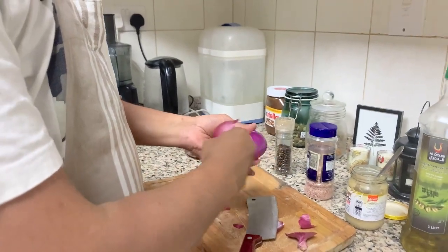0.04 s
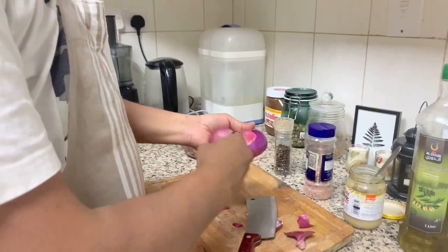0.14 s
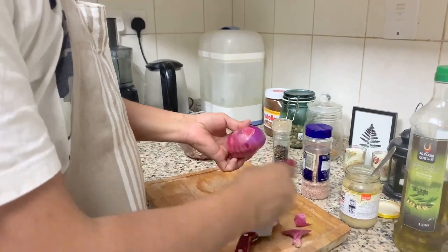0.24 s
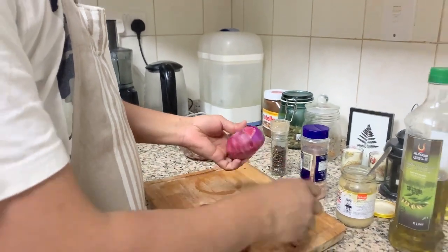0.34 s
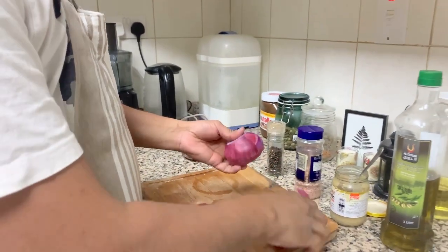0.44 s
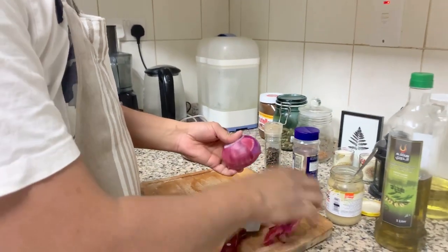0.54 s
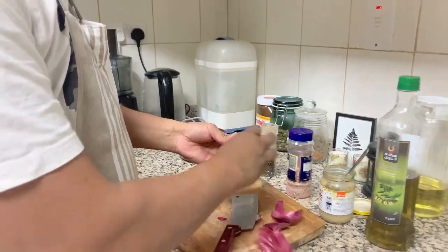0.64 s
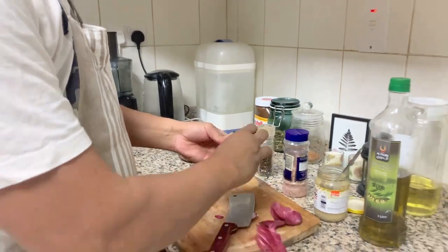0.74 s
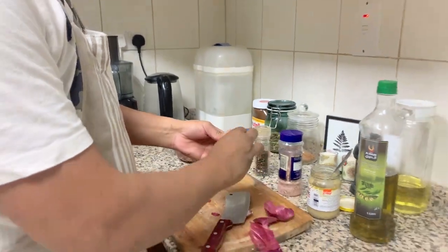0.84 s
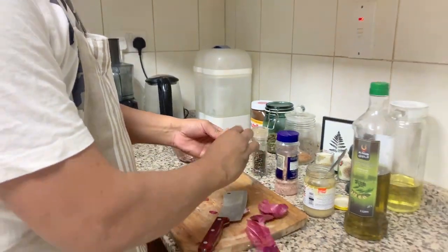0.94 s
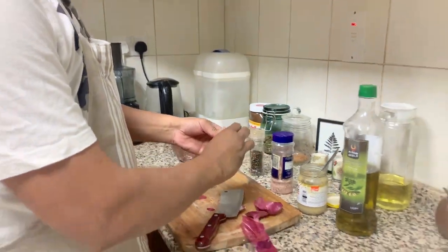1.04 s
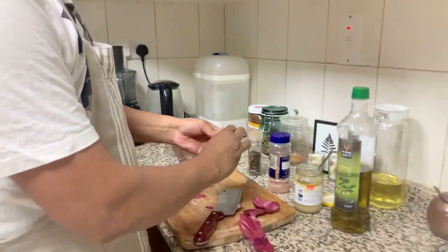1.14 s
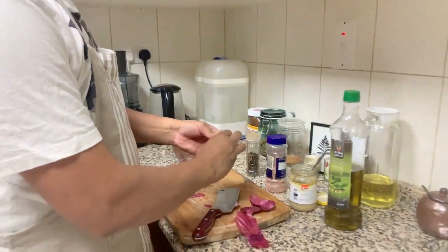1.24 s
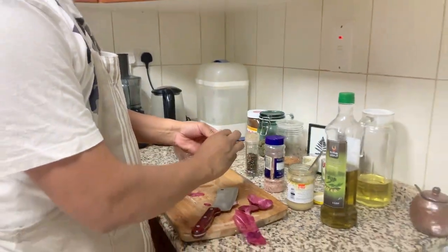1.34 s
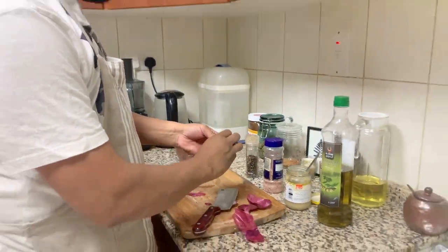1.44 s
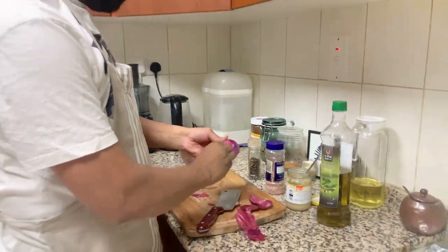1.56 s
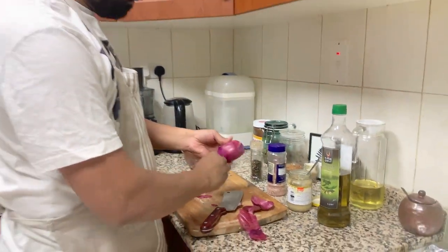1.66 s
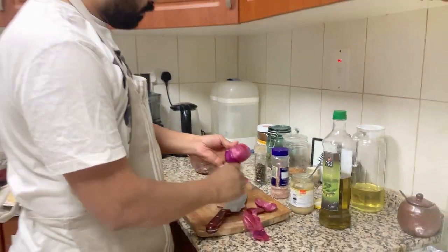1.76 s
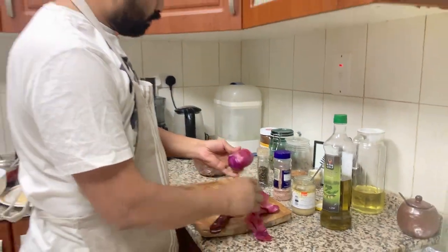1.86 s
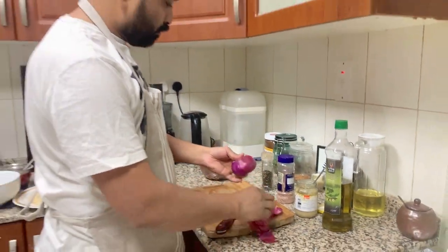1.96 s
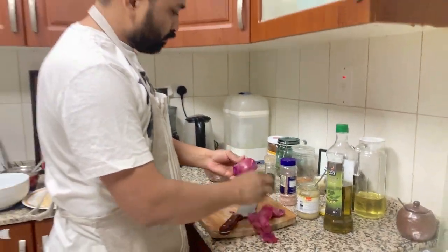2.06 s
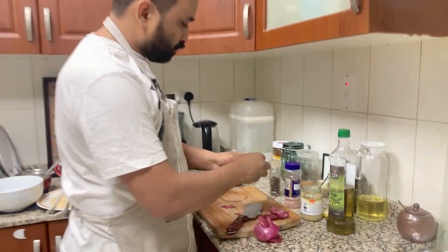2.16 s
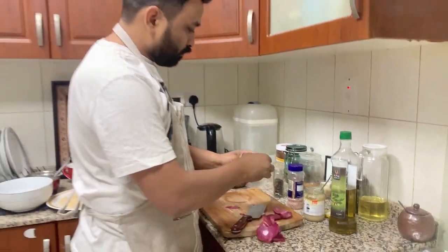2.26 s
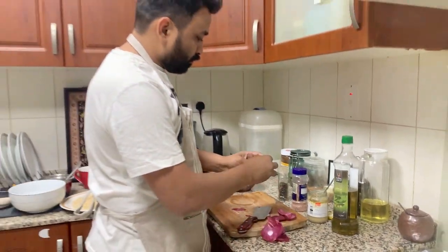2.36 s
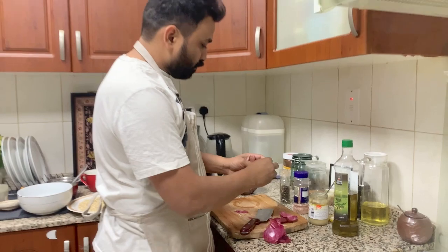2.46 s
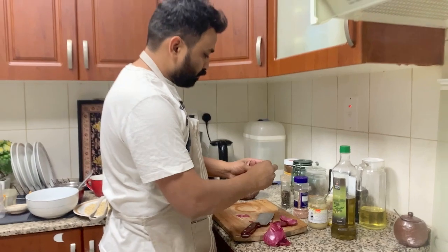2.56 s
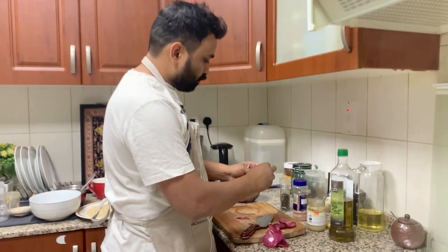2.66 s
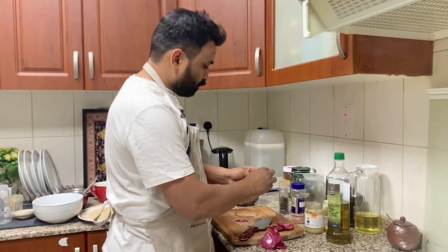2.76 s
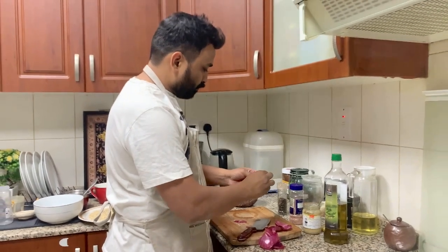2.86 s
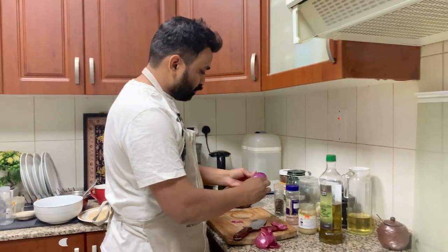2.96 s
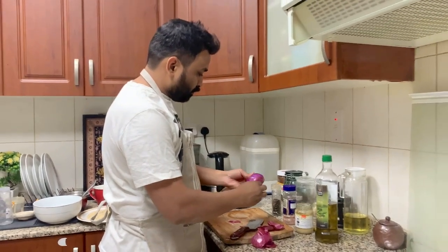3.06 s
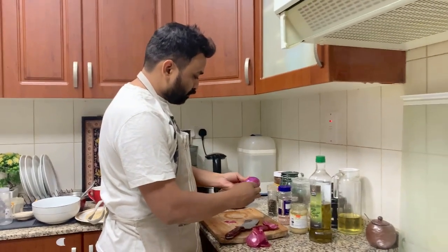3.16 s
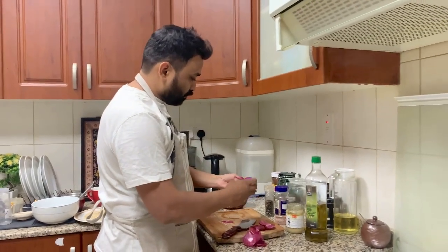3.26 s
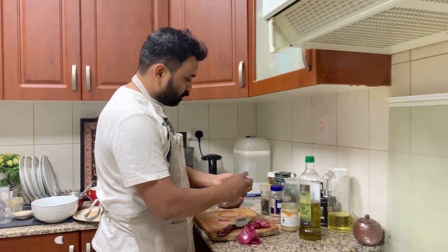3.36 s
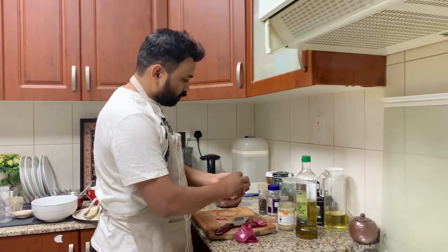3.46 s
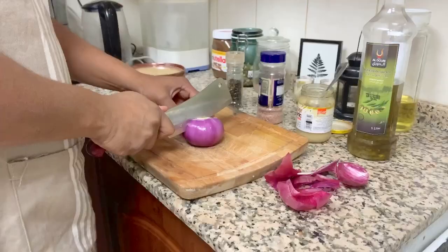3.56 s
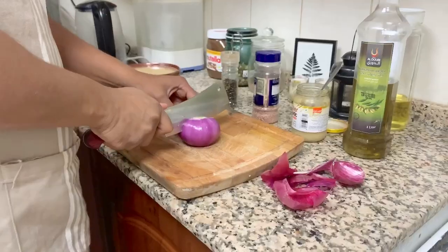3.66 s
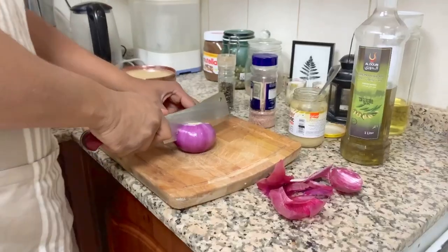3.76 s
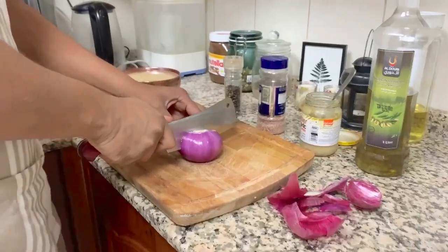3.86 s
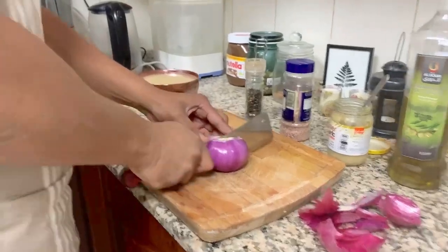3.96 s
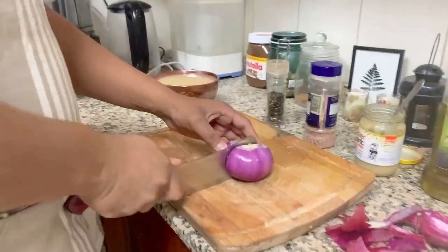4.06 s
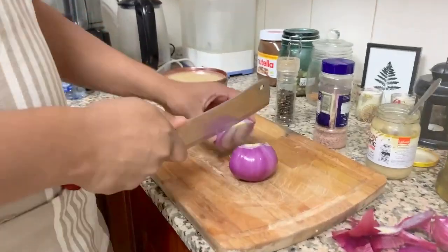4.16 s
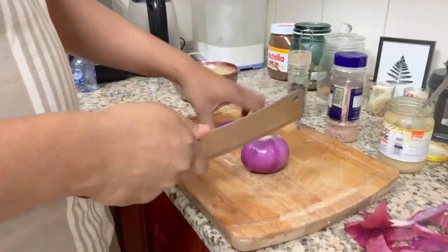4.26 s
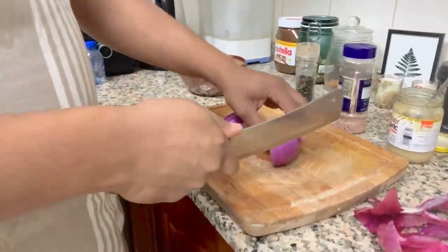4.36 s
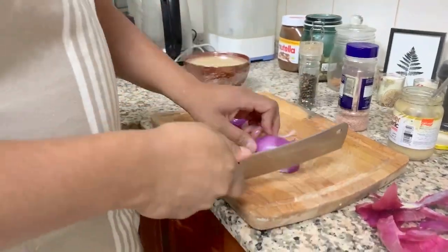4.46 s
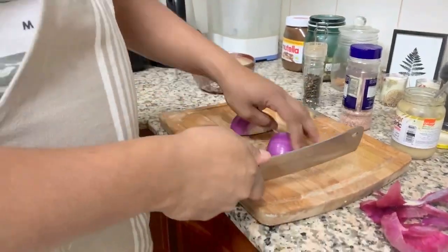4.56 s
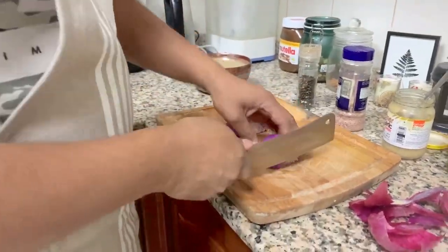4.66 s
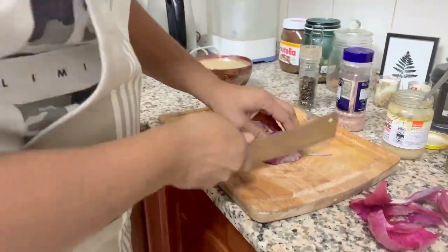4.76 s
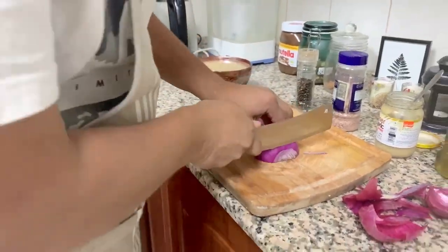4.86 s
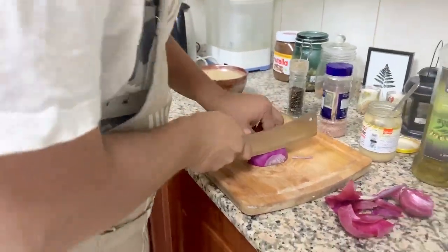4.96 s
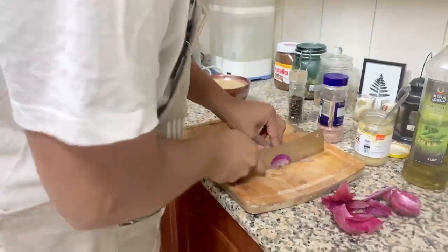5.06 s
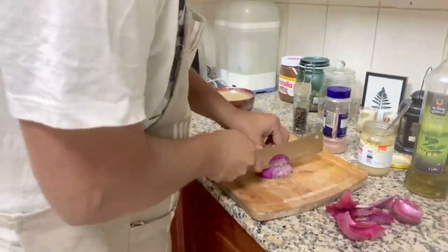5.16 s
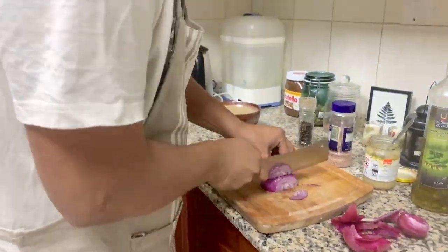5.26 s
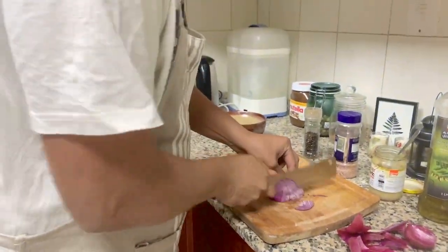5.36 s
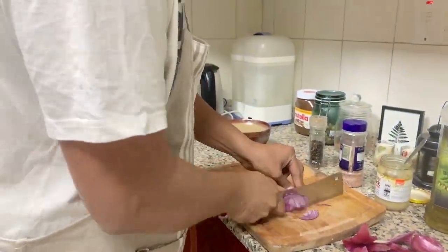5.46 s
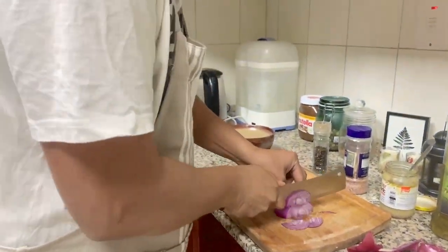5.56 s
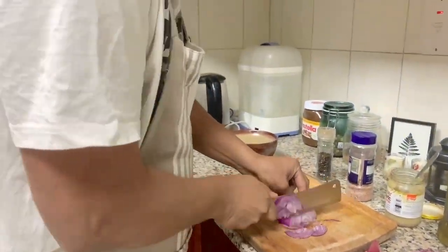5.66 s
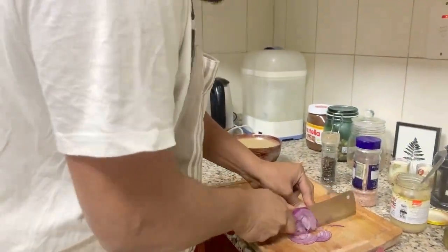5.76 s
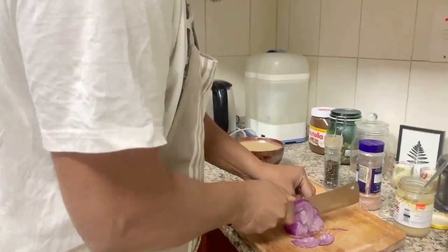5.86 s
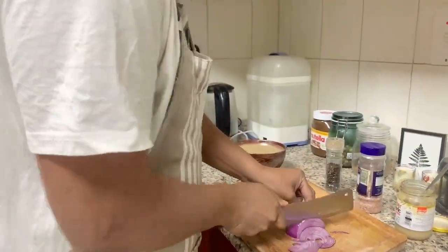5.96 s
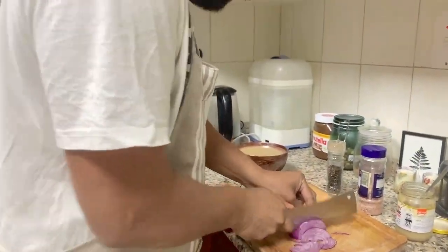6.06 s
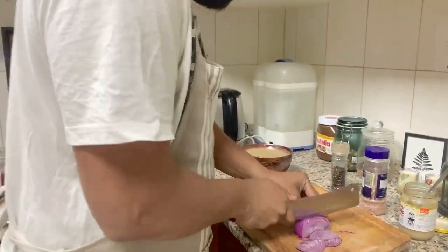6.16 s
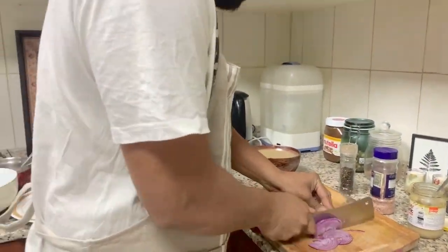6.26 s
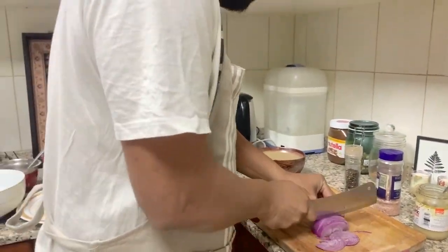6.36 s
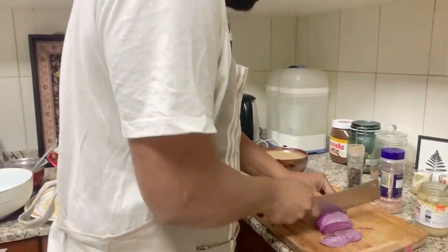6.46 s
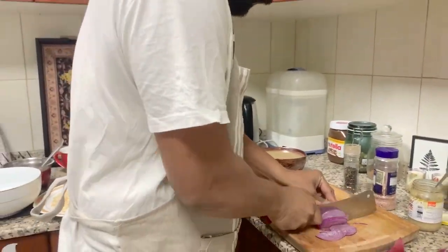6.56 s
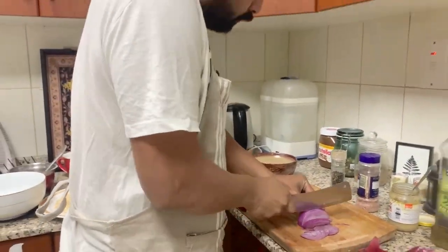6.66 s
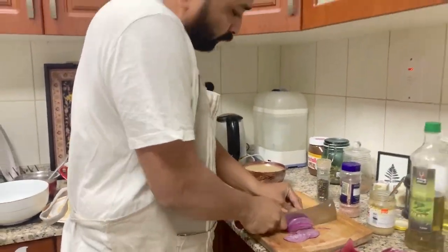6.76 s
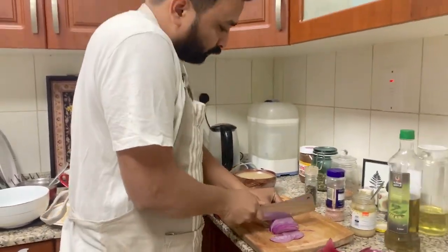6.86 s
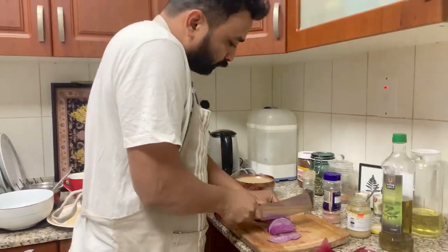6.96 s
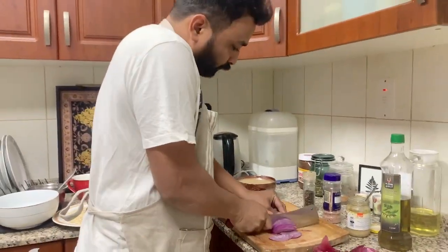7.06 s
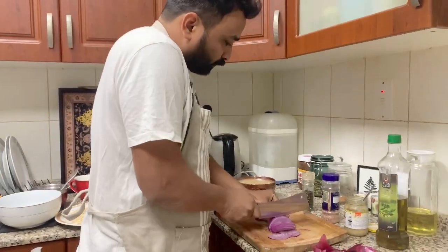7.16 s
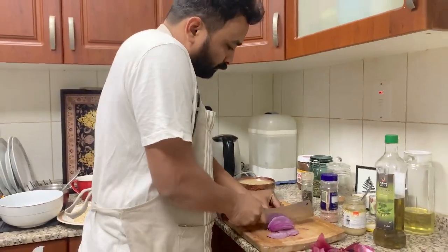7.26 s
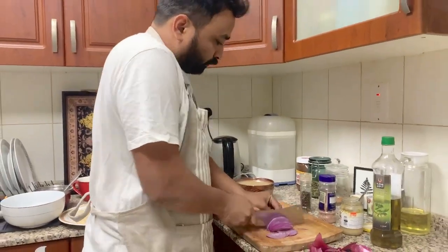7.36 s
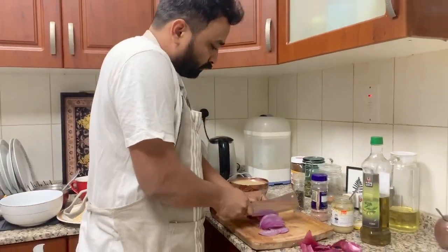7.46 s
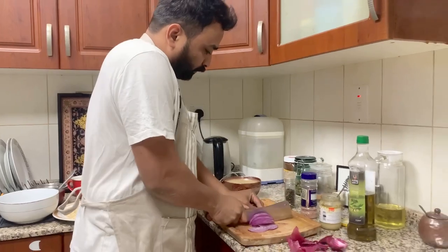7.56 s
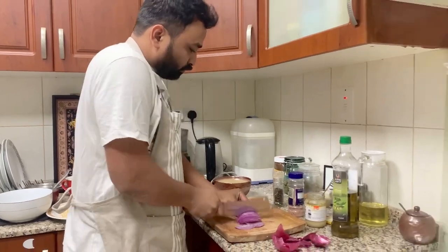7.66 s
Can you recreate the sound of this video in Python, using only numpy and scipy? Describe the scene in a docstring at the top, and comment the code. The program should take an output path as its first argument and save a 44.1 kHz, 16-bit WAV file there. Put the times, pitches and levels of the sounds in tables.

```python
"""Peeling and slicing an onion

In a tiled kitchen, hands peel an onion; after a brief gap of silence the scene changes, and it is sliced on a
wooden board. Dry skin is made of tiny random cracks and short noise bursts, with echoes from the kitchen. Each
cut crunches as grains of noise, then the cleaver knocks: noise and sine waves ring as board and blade. Soft
rubs, dull thuds, rumble and room noise fill in; a limiter holds down the highest peaks."""
import sys
import numpy as np
from scipy import signal
from scipy.fft import rfft, irfft
from scipy.io import wavfile
from scipy.ndimage import uniform_filter1d, minimum_filter1d, map_coordinates

SR = 44100
rng = np.random.default_rng(int(sys.argv[2]) if len(sys.argv) > 2 else 0)


def log_audio(samples):
    """Write samples as a 16-bit WAV file to the path given in sys.argv[1]."""
    # one column per channel
    frames = np.atleast_2d(samples).T
    # limit to full scale, then quantise
    limited = np.clip(frames, -1, 1)
    pcm = np.round(limited * 32767).astype(np.int16)
    wavfile.write(sys.argv[1], SR, pcm)


N = 339992
TIME = np.arange(N) / SR
RING = TIME[:SR // 2]  # the clock of one short sound, half a second

# Levels are settings before echoes, final filters and the limiter. A t60 is the time to fade by 60 dB.
# Spectra give level per Hz; only their shape counts, because the noise is then scaled to rms 1.

# cleaver meets board: t/s, wood level/dB, highest f excited by the contact/Hz, blade level/dB, crunch level/dB
CUTS = [(3.8329, -19.5, 10800, -13, -31.5), (4.962, -12, 8300, -7.5, -23.5),
        (5.1035, -12.5, 5950, -13, -26.5), (5.2376, -12, 4500, 4.5, -20),
        (5.378, -15.5, 6200, -21.5, -31.5), (5.4983, -14, 6450, -6, -25.5), (5.6671, -14, 1760, -1, -32),
        (5.813, -17, 6100, -29, -32), (5.9898, -10, 8100, -11.5, -28), (6.1538, -15.5, 6200, -29, -30),
        (6.3101, -11, 4500, 3, -25.5), (6.4736, -20, 4630, -30, -35), (6.646, -12.5, 10000, -24.5, -31.5),
        (6.9757, -14, 10000, -40, -31), (7.2109, -13, 11500, -22.5, -31), (7.459, -11.5, 11200, -18, -33)]
# dry skin snaps: t/s, level/dB, flake f/Hz, flake level/dB, after-ring level/dB (last two relative to the snap)
SNAPS = [(0.0946, -30, 2330, 2.5, -13.5), (0.4677, -19.5, 2370, -12, -16), (.915, -54.5, 1940, 6, -5),
         (0.992, -36.5, 2180, -11, -13.5), (1.346, -46, 2500, -10, 1), (1.375, -42, 2600, -6, -3),
         (1.3875, -17, 2880, -3.5, -6), (1.4686, -25, 2650, 3.5, -1.5), (2.4067, -26, 6120, -3.5, -15),
         (3.117, -49.5, 7400, -12, -4), (3.2478, -27.5, 2360, -4, -22), (3.36, -34.5, 4200, -4, -8)]
# dry skin tears: loudest t/s, length of the swell/s, level/dB, tilt/dB per octave
TEARS = [(.001, 0.057, -36.5, 1), (.275, 0.051, -48.5, -0.5), (.455, 0.036, -48, 1.5),
         (1.03, 0.045, -48, 6), (1.245, .048, -51.5, 5), (1.43, 0.094, -29, 2.5), (1.505, .1, -24.5, 2.5),
         (1.82, 0.032, -44, 0.5), (1.95, 0.14, -54.5, 1), (2.145, 0.025, -50.5, -3),
         (2.76, 0.069, -33, 5.5), (2.82, 0.1, -38.5, 2), (3.356, .028, -44, 4), (3.41, 0.076, -50.5, 11)]
# fingers and blade shift on the wet onion: loudest t/s, level/dB
RUBS = [(3.554, -45), (3.625, -40.5), (3.695, -43), (3.948, -33.5), (4.384, -48), (4.447, -52),
        (4.875, -48.5), (6.578, -63)]
# the onion's body thuds on the board as it splits, tips over or is pressed down: t/s, f/Hz, level/dB
THUDS = [(3.8346, 855, -27), (3.949, 670, -34), (4.378, 535, -27), (4.394, 626, -38), (5.22, 380, -33.5),
         (6.124, 380, -32), (6.288, 380, -33.5), (6.616, 380, -34)]
# ringing modes of the board on the counter: f/Hz, level/dB
BOARD_MODES = [(172, -6), (264, -1), (312, -7), (366, -6), (479, -7), (533, -6), (1017, -7), (1265, -7),
               (1330, -5), (1384, -5), (1518, -6), (2089, 0), (2546, -2), (2616, -1), (2762, -3),
               (2859, -2), (2929, -2), (3149, -1), (3203, -1), (3456, 0), (4247, -2), (4544, -1),
               (4619, -1), (5814, -2), (5927, -4)]
# ringing modes of the steel blade: f/Hz, level/dB, t60/s
BLADE_MODES = [(3063, -6, 0.11), (3122, -3, 0.15), (3241, 0, 0.11), (3316, -4, 0.11), (3871, -5, 0.12),
               (3957, -2, 0.13), (4102, -6, 0.12), (4285, -1, 0.11), (4506, -2, 0.11), (4592, -6, 0.16),
               (4646, -6, 0.11), (6277, -4, 0.15), (6352, -1, 0.14), (6406, -1, 0.15), (6492, -2, 0.16),
               (6562, 0, 0.16), (6611, -4, 0.12), (6675, -3, 0.11), (6821, -4, 0.15), (8312, -11, 0.13),
               (8629, -10, 0.12)]
# spectrum of the wooden board's dense ring: f/Hz, level/dB
WOOD_SPECTRUM = [(40, -33), (120, -72), (250, -7), (450, -9), (850, -2.5), (1800, -0.5), (2700, 7.5),
                 (4500, 3), (5400, -1.5), (6100, 1), (7600, -4.5), (10000, -3.5), (12000, -8), (16000, -22)]
# spectrum of the steel blade's countless weaker modes: f/Hz, level/dB
STEEL_SPECTRUM = [(300, -36), (2000, -27), (2800, -10.5), (3200, 3.5), (3550, -2), (4500, 4.5),
                  (5450, -5.5), (6500, 3.5), (7500, -8), (8600, -4), (9600, -11), (12000, -14),
                  (16000, -25)]
# spectrum of wet cells bursting: f/Hz, level/dB
CRUNCH_SPECTRUM = [(100, -11), (500, 11), (900, 5.5), (1800, 4), (2600, 5.5), (5300, 6.5), (6300, 10),
                   (7500, 7), (11000, 8.5), (16000, 5)]
# spectrum of dry skin tearing: f/Hz, level/dB
SKIN_SPECTRUM = [(150, -39), (250, -8.5), (566, -8.5), (640, -3.5), (890, -2.5), (1120, -4.5), (1220, -3),
                 (2710, -5), (3120, -7), (6700, -9), (10400, -27), (14700, -27), (16000, -23)]
# spectrum of a snap of dry skin: f/Hz, level/dB
SNAP_SPECTRUM = [(200, -22.5), (900, -8), (2200, 1.5), (4000, 0.5), (6300, -1.5), (8500, -13.5),
                 (11000, -23), (16000, -22)]
# how fast knocks and echoes fade while slicing: f/Hz, t60/s
SLICE_DECAY = [(150, 0.1), (400, 0.2), (1000, .15), (3000, 0.14), (7000, 0.15), (15000, 0.14)]
# how fast the echoes fade while peeling, longer than while slicing: f/Hz, t60/s
PEEL_DECAY = [(300, 0.38), (2000, 0.5), (5500, 0.44), (15000, 0.36)]
# spectrum of the room noise while peeling: f/Hz, level/dB
PEEL_AIR = [(12, -50), (20, -26), (44, -7.5), (107, -13.5), (187, -18), (301, -19.5), (337, -25.5),
            (367, -26), (399, -26), (718, -29), (849, -30), (1290, -25), (1660, -36), (5530, -44),
            (16000, -63)]
# spectrum of the room noise while slicing: f/Hz, level/dB
SLICE_AIR = [(15, -95), (25, -67), (76, -14), (130, -10.5), (190, 1.5), (285, -12.5), (344, -6.5),
             (624, -15.5), (796, -13), (1440, -22), (1610, -23.5), (3250, -23.5), (4740, -22),
             (5570, -28.5), (16000, -40)]
# narrow drones while peeling, two low hums and a thin whine: f/Hz, width/Hz, level/dB
PEEL_DRONES = [(52, 11, -53), (110.2, 14, -57), (1290, 92, -66)]
# narrow drones and a band of hiss while slicing: f/Hz, width/Hz, level/dB before the slicing air's trim
SLICE_DRONES = [(188.5, 8.5, -52), (349.3, 6.3, -57), (4790, 550, -62.5)]

PEEL_AIR_DB, SLICE_AIR_DB = -51, -48  # wash of the room noise, before the trim
SLICE_AIR_TRIM_DB = -0.5  # turns the whole slicing air down, drones included
BREAK_START_S, BREAK_END_S = 3.446, 3.502
TOP_HZ = 15850  # the finished sound has little above this

# a tear or rub swells for this share of its length and fades for the rest
RISE_SHARE = 0.39
RUB_S, RUB_TILT_DB = 0.025, 0.5  # tilt in dB per octave
# a smaller, higher flake also breaks more brightly (dB/octave of tilt for each octave of pitch)
FLAKE_WIDTH_HZ, USUAL_FLAKE_HZ, BRIGHTEN_DB = 960, 2520, 7.5

# an ordinary cut, which the rules for stroke and push start from
USUAL_BLOW_DB, USUAL_CRUNCH_DB = -12, -30
# strokes start quick; towards the thick middle of the onion the edge needs ever longer to get through
RUN_START_S, QUICK_STROKE_S, SLOWING_S_PER_S = 4.96, 0.026, 0.021
HURRY = 0.43  # power by which a hard blow shortens its stroke
# the edge scores the skin (share of the stroke), then bites in; the sound stops soon after it lands
SCORE_SHARE, SCORE_DB, BITE_S, STOP_S = 0.33, -19, 0.023, 0.0054
# the push on the board follows the crunch: dB in an ordinary cut, dB per dB of crunch
PUSH_DB, PUSH_PER_CRUNCH = -38, 1.02
HEAVE_DB = -12  # the landing heaves the whole board, relative to the blow
# a soft contact gives a broad, short thud and only the dull part of the board's ring
THUD_WIDTH_HZ, THUD_T60_S, THUD_CONTACT_HZ = 480, 0.14, 2420
THUD_WOOD_DB, THUD_BASS_DB = -4, -4  # relative to the thud


def amp(db):
    """Turns decibels into gain."""
    return 10 ** (np.asarray(db) / 20)


def unit(x):
    """Scales x to rms 1."""
    return x / np.sqrt(np.mean(x ** 2) + 1e-20)


def noise(length=len(RING)):
    """Plain random noise, half a second unless told otherwise."""
    return rng.standard_normal(length)


def read(points, hz):
    """Reads a table between its points, on a log-frequency axis."""
    f, value = np.transpose(points)
    return np.interp(np.log(hz + 1), np.log(f + 1), value)


def add(mix, s, sound):
    """Mixes a sound in at time s."""
    part = mix[max(round(s * SR), 0):][:len(sound)]
    part += sound[:len(part)]


def wander(length, step):
    """A smooth random curve of rms 1 that turns about every `step` points."""
    knots = noise(length)
    return unit(map_coordinates(knots, [np.arange(length) / max(step, 1)], order=3, mode="nearest"))


def colour(x, spectrum, tilt_db=0, ripple_db=0):
    """Gives x a spectrum at rms 1, tilted by dB per octave, with chance peaks from the spot that is touched."""
    hz = np.fft.rfftfreq(len(x), 1 / SR)
    octaves = np.log2(np.maximum(hz, 300))  # no tilt below 300 Hz
    # the peaks turn about every 260 Hz and shrink below 1 kHz
    ripple = ripple_db * wander(len(hz), 260 / hz[1]) * np.minimum(hz / 1000, 1)
    gain = amp(read(spectrum, hz) + tilt_db * octaves + ripple)
    return unit(irfft(rfft(x) * gain, len(x)))


def band(x, hz, width):
    """Keeps a bell-shaped band of x, at rms 1."""
    f = np.fft.rfftfreq(len(x), 1 / SR)
    bell = 1 / (1 + (1.3 * (f - hz) / width) ** 2) ** 2  # about half as strong at the edges of the width
    return unit(irfft(rfft(x) * bell, len(x)))


def die_away(x, decays):
    """Lets every frequency of x fade with its own t60."""
    hz, t, z = signal.stft(x, SR, nperseg=256)
    faded = z * amp(-60 * t / read(decays, hz)[:, None])
    return signal.istft(faded, SR, nperseg=256)[1][:len(x)]


def room(x, decays, wet_db):
    """Adds the reflections from tiles and cupboards, a fading noise tail that starts after 3.1 ms."""
    tail = die_away(noise(), decays) * np.clip(RING / 0.0031 - 1, 0, 1)
    echoes = signal.fftconvolve(x, tail / np.linalg.norm(tail))[:N]
    return (x + amp(wet_db) * echoes) / np.hypot(1, amp(wet_db))


def air(spectrum, db, drones):
    """Steady room noise: a coloured wash, with narrower bands of noise that waver."""
    out = amp(db) * colour(noise(N), spectrum)
    for hz, width, level_db in drones:
        out += amp(level_db) * band(noise(N), hz, width)
    return out


def grains(length, per_s, spread_db):
    """Tiny fractures of very uneven size, at random moments."""
    hit = rng.random(length) < per_s / SR
    size = np.minimum(rng.exponential(1, length), 4)
    sign = rng.choice([-1, 1], length)
    return hit * sign * amp(spread_db * size)


def rustle(table, spectrum, per_s, spread_db):
    """Swells of small fractures, one for each stroke of the fingers."""
    out = np.zeros(N)
    for s, length, db, tilt_db in table:
        rise, fall = length * RISE_SHARE, length * (1 - RISE_SHARE)
        start = max(s - 2 * rise, 0)
        t = RING + start - s
        swell = np.exp(-(t / np.where(t < 0, rise, fall)) ** 2)
        fractures = colour(grains(len(RING), per_s, spread_db), spectrum, tilt_db)
        add(out, start, amp(db) * swell * fractures)
    return out


def tears():
    """Dry skin tears in dense crackles of small fractures."""
    return rustle(TEARS, SKIN_SPECTRUM, per_s=3000, spread_db=2.5)


def snaps():
    """Dry skin breaks in a burst of a few milliseconds with a flake's own pitch; a longer after-ring follows."""
    out = np.zeros(N)
    for s, db, flake_hz, flake_db, after_db in SNAPS:
        tilt_db = BRIGHTEN_DB * np.log2(flake_hz / USUAL_FLAKE_HZ)

        def burst():
            """Broad noise plus the band where the flake rings."""
            flake = amp(flake_db) * band(noise(), flake_hz, FLAKE_WIDTH_HZ)
            return colour(noise(), SNAP_SPECTRUM, tilt_db) + flake

        snap = 0.87 * burst() * np.exp(-RING / 0.0049)
        after_ring = amp(after_db) * die_away(burst(), PEEL_DECAY)
        add(out, s, amp(db) * (snap + after_ring))
    return out


def peeling():
    """Skin tears with echoes, and snaps that bring their own after-ring."""
    return room(tears(), PEEL_DECAY, wet_db=-3.0) + snaps()


def rubs():
    """Fingers and blade shift on the wet onion, in short swells of small fractures."""
    swells = [(s, RUB_S, db, RUB_TILT_DB) for s, db in RUBS]
    return rustle(swells, CRUNCH_SPECTRUM, per_s=2200, spread_db=3.5)


def force(wood_db, blade_db):
    """The strength of a blow, shared between board and blade."""
    return np.hypot(amp(wood_db), 0.58 * amp(blade_db))


def board_bass():
    """The lowest bending modes of the board, shaken at random."""
    push = noise()
    return unit(band(push, 174.8, 32) + 1.6 * band(push, 259, 64) + 0.51 * band(push, 493, 110))


def cut_stroke(s, wood_db, blade_db):
    """Loudness curve of the edge going through the onion, and its lead in seconds before the knock."""
    blow = force(wood_db, blade_db) / amp(USUAL_BLOW_DB)
    slow_s = QUICK_STROKE_S + SLOWING_S_PER_S * max(s - RUN_START_S, 0)
    length = slow_s / blow ** HURRY  # a hard blow gets through sooner
    lead = length * (1 + SCORE_SHARE)
    bite = np.clip((RING - SCORE_SHARE * length) / BITE_S, 0, 1) ** 1.7
    stop = np.exp(-np.maximum(RING - lead, 0) / STOP_S)
    return np.maximum(bite, amp(SCORE_DB)) * stop, lead


def rumble_and_crunch():
    """The push makes the board rumble while the edge bursts wet cells, layer after layer."""
    rumble, crunch = np.zeros(N), np.zeros(N)
    for s, wood_db, _, blade_db, crunch_db in CUTS:
        stroke, lead = cut_stroke(s, wood_db, blade_db)
        push = amp(PUSH_DB + PUSH_PER_CRUNCH * (crunch_db - USUAL_CRUNCH_DB))
        add(rumble, s - lead - 0.008, push * stroke * board_bass())
        layers = amp(3 * wander(len(RING), 0.005 * SR))  # turns about every 5 ms
        bursts = layers * grains(len(RING), per_s=7000, spread_db=3)
        cells = colour(bursts, CRUNCH_SPECTRUM, ripple_db=2.3)
        add(crunch, s - lead, amp(crunch_db) * stroke * cells)
    return rumble, crunch


def modes(hz, db, detune):
    """A sine for each mode; each blow lands elsewhere and weights them anew."""
    size, shift, phase = rng.standard_normal((3, len(hz), 1))
    pitch = hz[:, None] * (1 + detune * shift)
    return amp(db[:, None] + 2 * size) * np.sin(2 * np.pi * (pitch * RING + phase))


def dense_ring(spectrum, ripple_db):
    """Countless overlapping modes and reflections, as noise that dies away."""
    return die_away(colour(noise(), spectrum, ripple_db=ripple_db), SLICE_DECAY)


def board(contact_hz):
    """The board rings a little differently at each spot; a longer, softer contact leaves out the top."""
    dense = dense_ring(WOOD_SPECTRUM, ripple_db=1.8)
    tones = modes(*np.transpose(BOARD_MODES), detune=0.003).sum(0)
    ring = 0.96 * dense + amp(-15.5) * die_away(tones, SLICE_DECAY)
    contact = signal.butter(4, min(contact_hz, SR / 3), fs=SR, output="sos")
    return signal.sosfilt(contact, ring)


def blade():
    """The steel rings in clusters of close modes, at almost the same pitches on every blow."""
    hz, db, t60 = np.transpose(BLADE_MODES)
    tones = modes(hz, db, detune=0.0006) * amp(-60 * RING / t60[:, None])
    return 0.82 * dense_ring(STEEL_SPECTRUM, ripple_db=0.6) + amp(-13.5) * tones.sum(0)


def knocks():
    """The edge lands: a direct crack of a few milliseconds, then board and blade ring out."""
    out = np.zeros(N)
    crack = np.minimum(RING / 0.0003, 1) * (1 + 0.9 * np.exp(-(RING / 0.0035) ** 2))
    heave = np.minimum(RING / 0.015, 1) * np.exp(-RING / 0.019)  # the bass takes longer to build
    for s, wood_db, contact_hz, blade_db, _ in CUTS:
        blow = force(wood_db, blade_db)
        firm = min(blow / amp(USUAL_BLOW_DB), 1) ** 2  # a gentle landing hardly ticks
        edge_tick = amp(2.5) * band(noise(), 8330, 6300) * np.exp(-RING / 0.00085)
        ring = amp(wood_db) * board(contact_hz) + amp(blade_db) * blade()
        add(out, s, crack * (ring + blow * firm * edge_tick))
        add(out, s, amp(HEAVE_DB) * blow * heave * board_bass())
    return out


def thuds():
    """The soft body of the onion meets the board: a fading band of noise, some bass and a dull wood ring."""
    out = np.zeros(N)
    fade = np.minimum(RING / 0.001, 1) * amp(-60 * RING / THUD_T60_S)
    for s, hz, db in THUDS:
        body = band(noise(), hz, THUD_WIDTH_HZ) + amp(THUD_BASS_DB) * board_bass()
        wood = amp(THUD_WOOD_DB) * board(THUD_CONTACT_HZ)
        add(out, s, amp(db) * (fade * body + wood))
    return out


def slicing():
    """Rubs and crunches with echoes, the rumble of the push, then knocks and thuds."""
    rumble, crunch = rumble_and_crunch()
    wet_cells = room(rubs() + crunch, SLICE_DECAY, wet_db=-4)
    # a high-pass keeps knocks and thuds free of deep bass
    high_pass = signal.butter(2, 100, "high", fs=SR, output="sos")
    return wet_cells + rumble + signal.sosfilt(high_pass, knocks() + thuds())


def scene():
    """Peeling, a brief gap of silence as the scene changes, then slicing."""
    before = np.clip((BREAK_START_S - TIME) / 0.003, 0, 1)
    after = np.clip((TIME - BREAK_END_S) / 0.014, 0, 1)
    first = air(PEEL_AIR, PEEL_AIR_DB, PEEL_DRONES) + peeling()
    slice_air = amp(SLICE_AIR_TRIM_DB) * air(SLICE_AIR, SLICE_AIR_DB, SLICE_DRONES)
    second = slice_air + slicing()
    return (before * first + after * second)[None]


def record(dry, recovery_db_per_s=650):
    """A fast limiter holds down peaks above -1.1 dB of full scale; then a low-pass takes off the top."""
    over_db = np.maximum(20 * np.log10(abs(dry[0]) + 1e-9) + 1.1, 0)
    # the gain drops at once and recovers at a steady rate
    fall = TIME * recovery_db_per_s
    held_db = np.maximum.accumulate(over_db + fall) - fall
    # looking a few samples ahead and smoothing softens the start of each drop
    gain = uniform_filter1d(minimum_filter1d(amp(-held_db), size=31), size=31)
    low_pass = signal.firwin(511, TOP_HZ, window=("kaiser", 8), fs=SR)
    return signal.oaconvolve(dry * gain, low_pass[None], "same")


dry = scene()
out = record(dry)
log_audio(out)
```